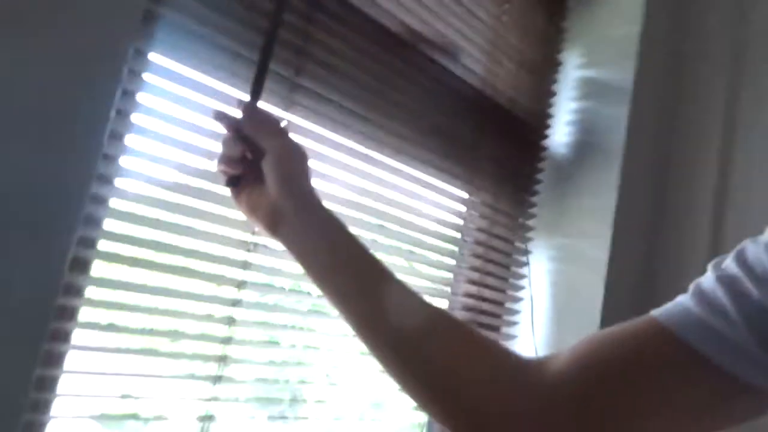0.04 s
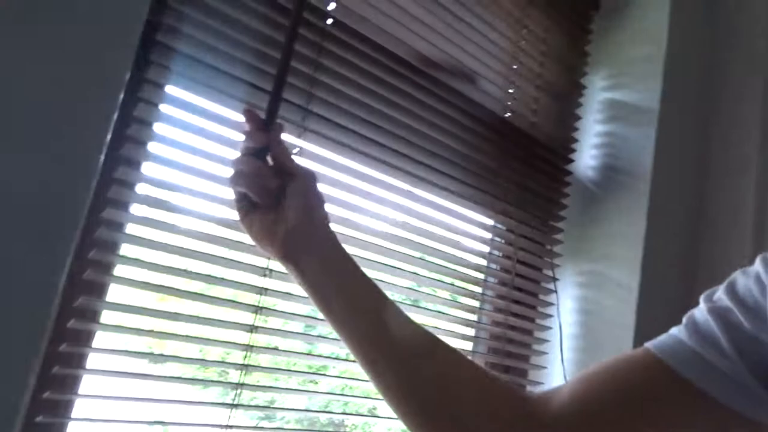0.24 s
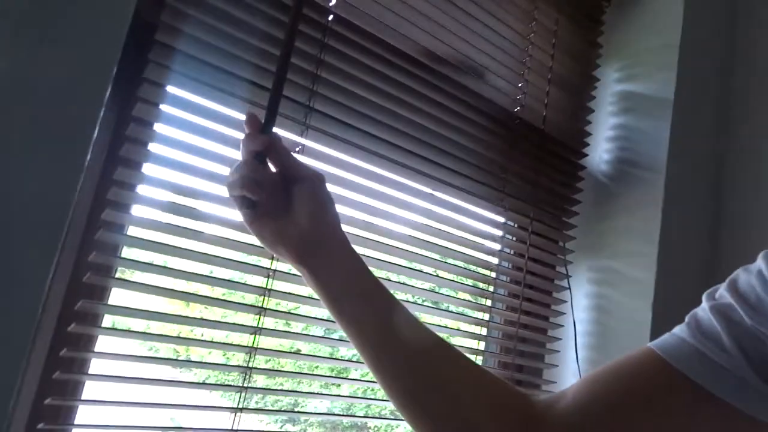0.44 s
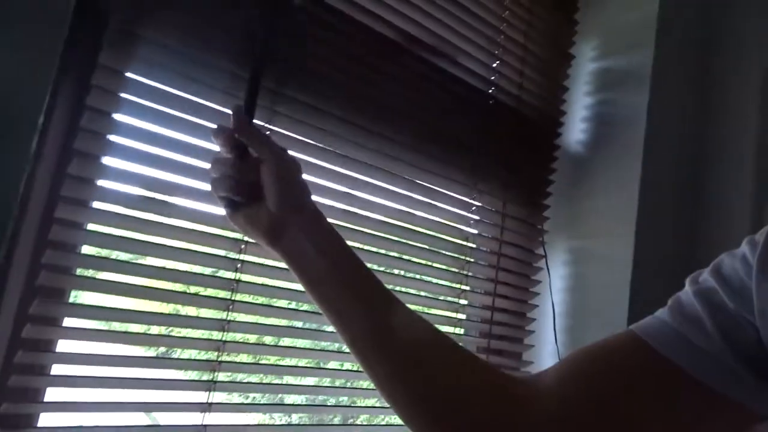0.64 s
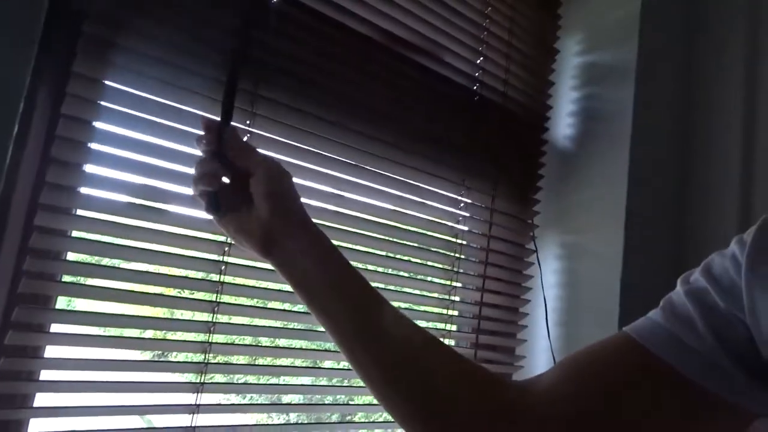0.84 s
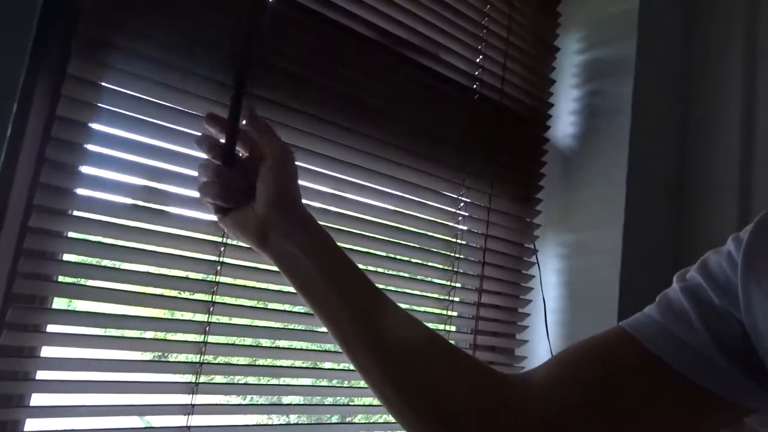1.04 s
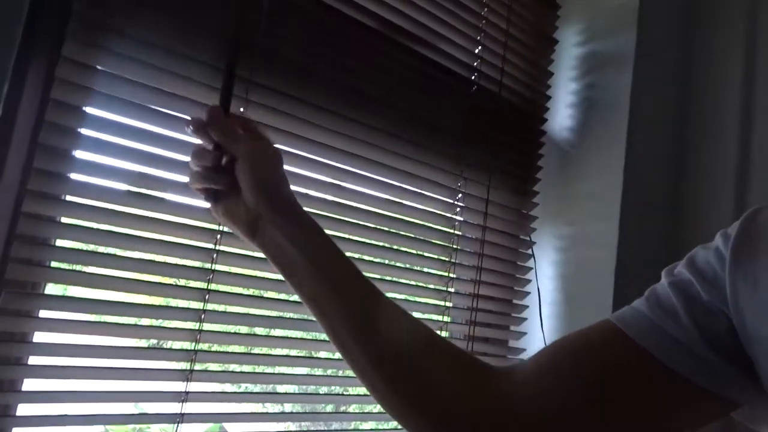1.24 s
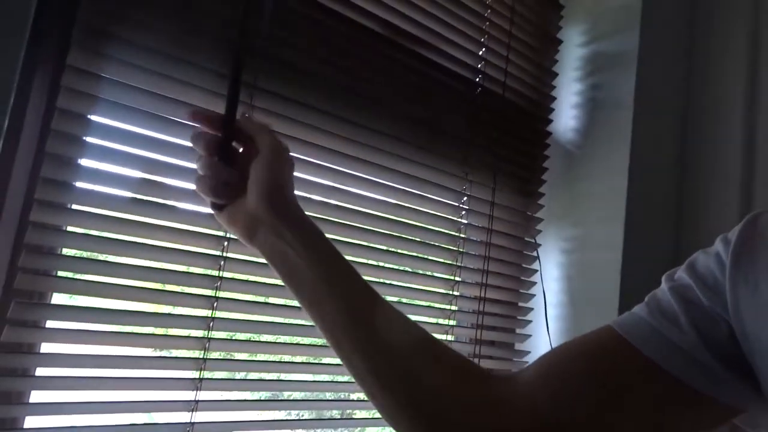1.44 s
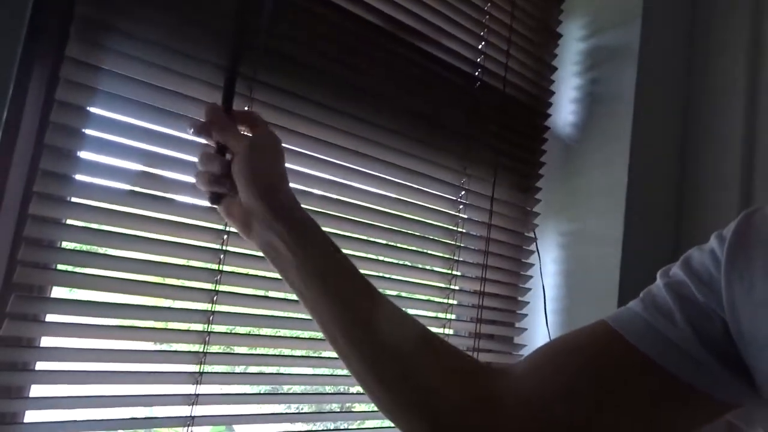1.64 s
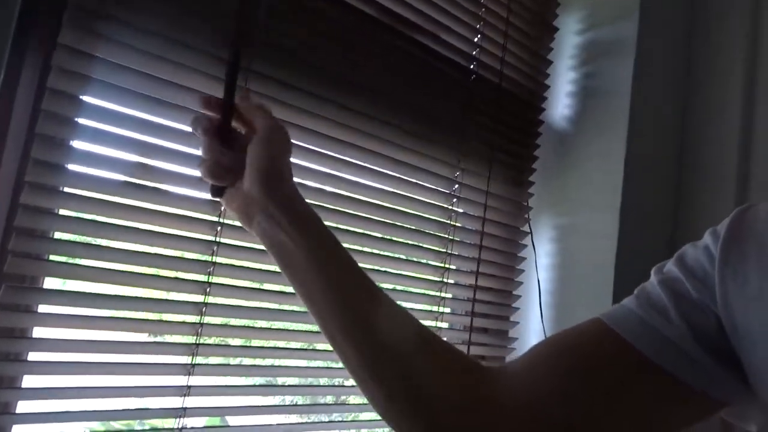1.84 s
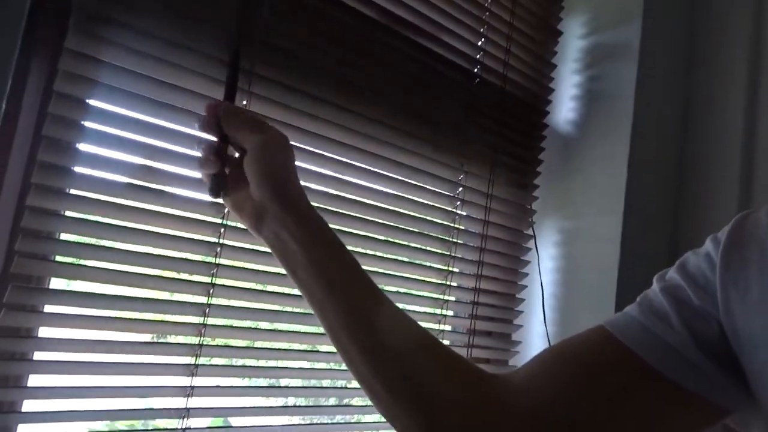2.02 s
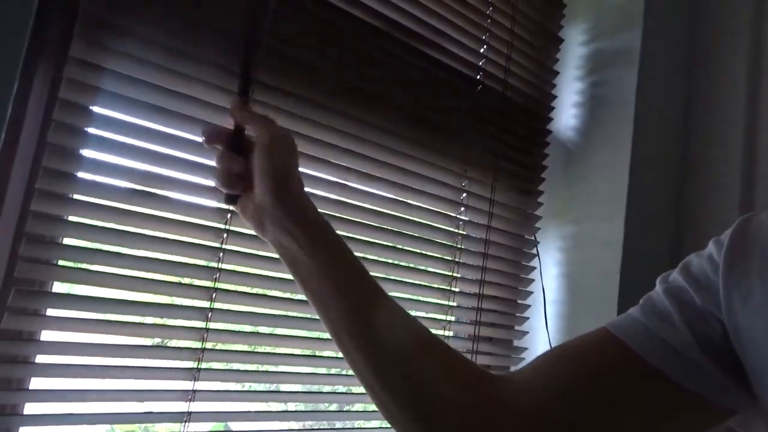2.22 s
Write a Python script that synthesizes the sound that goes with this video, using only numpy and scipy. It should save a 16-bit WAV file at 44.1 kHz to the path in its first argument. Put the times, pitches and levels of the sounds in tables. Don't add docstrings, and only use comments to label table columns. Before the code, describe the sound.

A wooden venetian blind clicks and rattles as its wand is twisted. Cloth rustles softly until 0.35 s with faint ticks. From 0.44 to 1.3 s, irregular woody knocks and slat clatter crowd together, with strong bursts near 0.54, 0.9 and 1.03 and a sharp tick at 1.19. Sparser knocks follow at 1.6, 1.67 and 2.08, with a faint finger rub around 1.83. Quiet room hiss, close stereo pickup, short reverberation.

```python
import sys
import numpy as np
from scipy import signal
from scipy.fft import rfft, irfft
from scipy.io import wavfile
from scipy.ndimage import uniform_filter1d

SR = 44100
rng = np.random.default_rng(int(sys.argv[2]) if len(sys.argv) > 2 else 0)


def magnitude_from_level(level_db):
    exponent = np.asarray(level_db, float) / 20
    return 10 ** exponent


def bounce(signal):
    frames = np.transpose(np.atleast_2d(signal))
    limited = np.clip(frames, -1, 1)
    pcm = np.round(limited * 32767).astype(np.int16)
    wavfile.write(sys.argv[1], SR, pcm)


N = 100371

WIDTH_RAD_PER_KHZ = 0.11
BASS_RISE_CYCLES = 2.17


def evened(x):
    return x / np.sqrt(np.mean(x ** 2) + 1e-20)


def read(points, hz):
    f, value = np.transpose(points)
    return np.interp(np.log(hz + 1), np.log(f + 1), value)


def add(mix, s, sound):
    part = mix[:, max(round(s * SR), 0):][:, :sound.shape[1]]
    part += sound[:, :part.shape[1]]


# frequency in Hz, left-right likeness from 0 to 1.
COHERENCE = [(60, 0.72), (220, 1), (820, 0.37), (3030, 0.23), (11200, 0.046)]


def hiss(colour, patchy_db, tilt_db=0):
    frames, hz = N // 128 + 5, np.fft.rfftfreq(512, 1 / SR)
    a, b, c, d, patches = rng.standard_normal((frames, 257, 5)).T
    patches = uniform_filter1d(patches, size=6, axis=0)
    patches = evened(uniform_filter1d(patches, size=10, axis=1))
    same = np.clip(read(COHERENCE, hz), -1, 1)[:, None]
    left, other = a + 1j * b, c + 1j * d
    z = np.array([left, same * left + np.sqrt(1 - same ** 2) * other])
    octaves = np.log2(np.maximum(hz[:, None], 500) / 2000)
    tilt = octaves * np.resize((tilt_db * np.ones(N))[::128], frames)
    z *= magnitude_from_level(read(colour, hz)[:, None] + patchy_db * patches + tilt)
    return evened(signal.istft(z, nperseg=512, noverlap=384)[1][:, :N])


# frequency in Hz, level in dB.
AIR_COLOUR = [(18, -50), (30, -51), (452, 4), (1350, 8.5), (5320, 5.5), (5870, 1), (6650, 3), (9660, -2),
              (11500, -5.5), (15000, -68), (22000, -120)]


def air():
    return magnitude_from_level(-60) * hiss(AIR_COLOUR, patchy_db=-0.5)


# time in seconds, level in dB, brightness in dB per octave.
SLEEVE_STROKE = [
    (0, -42, 1.5),
    (.08, -44.5, -3),
    (.12, -46, 3),
    (.18, -45.5, 3.5),
    (.23, -50, 2.5),
    (.3, -57.5, 5.5),
    (0.359, -66.5, -7),
]
# frequency in Hz, level in dB.
CLOTH_COLOUR = [(88, -86), (150, -47), (525, -6), (857, -3.5), (1740, 2.5), (1910, -4.5), (2890, -2),
                (10300, -22.5), (11500, -25), (15000, -69), (22000, -120)]


def sleeve():
    t = np.arange(N) / SR
    s, db, bright_db = np.transpose(SLEEVE_STROKE)
    cloth = hiss(CLOTH_COLOUR, patchy_db=0, tilt_db=np.interp(t, s, bright_db))
    cloth /= np.sqrt(abs(uniform_filter1d((cloth ** 2).mean(0), size=4000)) + 1e-9)
    cloth *= magnitude_from_level(0.81 * evened(uniform_filter1d(rng.exponential(1, N) - 1, size=250)))
    scrape = signal.filtfilt(*signal.iirpeak(556, 5, SR), rng.standard_normal(N))
    scrape = magnitude_from_level(-13.5) * evened(scrape) * np.exp(-(t / 0.19) ** 4)
    return magnitude_from_level(np.interp(t, s, db, right=-120)) * (cloth + scrape)


# frequency in Hz, level in dB.
SLAT_COLOUR = [(120, -71), (270, -43), (320, -35.5), (560, -26.5), (730, -10.5), (2600, -3.5), (4500, -5),
               (5800, -14), (11500, -30)]
# frequency in Hz, 60 dB decay time in seconds.
SLAT_DECAY = [(400, 0.29), (1000, 0.086), (3000, 0.053), (6000, 0.0097), (11000, 0.024)]


def slats(bright_db, count=4):
    hz, t = np.fft.rfftfreq(128, 1 / SR)[:, None], np.arange(130) * 32 / SR
    t60 = read(SLAT_DECAY, hz)
    noise = rng.standard_normal((2, count, 4128))
    z = signal.stft(noise, nperseg=128, noverlap=96)[2][..., :130]
    apart = np.clip(WIDTH_RAD_PER_KHZ * hz / 1000, 0, .6)
    z = np.array([z[0] - apart * z[1], z[0] + apart * z[1]]) / np.sqrt(1 + apart ** 2)
    swell = -np.expm1(-(hz * t + 0.069) / BASS_RISE_CYCLES)
    z = z * magnitude_from_level(-60 * t / t60) / np.sqrt(t60) * swell
    rings = signal.istft(z, nperseg=128, noverlap=96)[1][..., :4096]
    fine = np.fft.rfftfreq(8192, 1 / SR)
    colour_db = read(SLAT_COLOUR, fine) + bright_db * np.log2(np.maximum(fine, 500) / 2000)
    log_gain = np.log(magnitude_from_level(colour_db) + 1e-5)
    causal = np.exp(np.conj(signal.hilbert(np.r_[log_gain, log_gain[-2:0:-1]])))[:4097]
    rings = irfft(rfft(rings, 8192) * causal)[..., :4500]
    return rings / np.linalg.norm(rings) * np.sqrt(2 * count)


def levelled(x):
    z = rfft(x)
    hz = np.fft.rfftfreq(2 * len(z[0]) - 2, 1 / SR)
    power = (abs(z) ** 2).sum(0) / magnitude_from_level(2 * read(SLAT_COLOUR, hz))
    lumps = uniform_filter1d(power, size=26) / uniform_filter1d(power, size=300)
    return irfft(z / np.sqrt(abs(lumps) + .1), x.shape[1]) * (np.arange(x.shape[1]) < 7500)


RAIL_MODE_HZ = np.array([716, 787, 925, 1100, 1203, 1358, 1825, 1933, 2106, 2532, 2835, 3413, 3556, 3754])
RAIL_MODE_DB = [-2, -1, -6, -5, -6, -6, 0, -4, -1, 0, -6, -6, -4, -3]


def head_rail(knocks, bright_db):
    hz, t = RAIL_MODE_HZ, np.arange(4500) / SR
    db = RAIL_MODE_DB + bright_db * np.log2(hz / 2000) + 2.5 * rng.standard_normal(len(hz))
    db -= 20 * np.log10(abs(rfft(knocks, SR)[hz]) + .3)
    chance = rng.standard_normal((len(hz), 2))
    t60 = .07
    modes = np.exp(np.outer(2j * np.pi * hz - np.log(1000) / t60, t))
    modes *= -np.expm1(-np.outer(hz, t) / BASS_RISE_CYCLES)
    apart = WIDTH_RAD_PER_KHZ * hz / 1000 * chance[:, 1] * np.array([[-.5], [.5]])
    ring_out = ((magnitude_from_level(db) * np.exp(1j * (7 * chance[:, 0] + apart))) @ modes).real
    ring_out *= np.sqrt(2) / np.linalg.norm(ring_out)
    return signal.fftconvolve(knocks[None], ring_out, axes=1)


# start in seconds, spread of the knocks in seconds, level in dB,
# brightness in dB per octave, rise in seconds.
GEAR_SLIPS = [(.441, 0.009, -37, 1, 0.00022), (.533, 0.0024, -31.5, 1, 0.00098),
              (.539, 0.0099, -33.5, -2, 0.0081), (0.6803, 0.0046, -28.5, -0.5, 0.00078),
              (.816, 0.013, -37, -0.5, 0.0011), (0.835, 0.014, -39, -4.5, 0.0051),
              (0.895, 0.0036, -25.5, 9.5, .003), (0.9, 0.0098, -26, -2, 0.0048),
              (1.0265, 0.0089, -25, -2.5, 0.00043), (1.057, 0.0025, -34, 1, 0.00069),
              (1.165, 0.025, -35.5, -4, 0.00043), (1.194, 0.0085, -32, -2, 0.000097),
              (1.2395, 0.0076, -32, 4.5, 0.00026), (1.26, 0.0042, -29.5, -1, 0.0035),
              (1.269, 0.009, -25, 0.5, 0.0038), (1.592, 0.0072, -24.5, 0, 0.0044),
              (1.673, 0.0058, -33, -0.5, 0.0014), (2.007, 0.0052, -39, 0, 0.00016),
              (2.0765, 0.0071, -28.5, -2, 0.00086), (.604, 0.017, -38, -2.5, 0.0081),
              (0.869, 0.029, -32.5, -4, 0.039), (1.548, 0.037, -48.5, -3.5, 0.021),
              (2.049, 0.023, -41, -5.5, 0.015)]
# start in seconds, spread in seconds, level in
# dB, brightness in dB per octave.
SMALL_JOLTS = [(.001, 0.0032, -38, 27), (0.193, 0.0061, -47.5, -6.5), (0.355, 0.0034, -53, -1),
               (.43, 0.0044, -52.5, -5.5), (.495, 0.093, -46, -8.5), (0.0561, 0.0011, -45, 0.5),
               (0.107, 0.0077, -48.5, -4), (.675, 0.0014, -45.5, 4), (.693, 0.012, -56, 9),
               (0.7432, 0.0054, -44, -3.5), (.765, 0.0073, -42.5, -5.5), (1.085, 0.0068, -39, -2.5),
               (1.385, 0.0023, -48.5, 1.5), (1.943, 0.0039, -49, -8.5), (2.213, 0.0051, -52, -2),
               (2.243, 0.0034, -50.5, -6.5)]


def jolt(start, spread, level_db, bright_db, rise=0.0012):
    t = np.arange(4000) / SR
    draw, size, which = rng.random(4000), rng.exponential(1, 4000), rng.integers(0, 4, 4000)
    knocks_per_s = 5000
    knocks = (draw < knocks_per_s / SR) * np.sign(np.sin(1e7 * draw))
    knocks[0] = 1
    knocks *= magnitude_from_level(2.5 * np.minimum(size, 4))
    knocks *= -np.expm1(-(t + 1e-4) / max(rise, 1e-4)) * np.exp(-t / max(spread, .001))
    knocks /= np.linalg.norm(knocks)
    shared = knocks * (which == np.arange(4)[:, None])
    body = signal.fftconvolve(shared[None], slats(bright_db), axes=2).sum(1)
    knocking = levelled(body + magnitude_from_level(-7) * head_rail(knocks, bright_db))
    push = np.arange(body.shape[1]) / SR / 0.00116
    thump = magnitude_from_level(-67) * rng.uniform(-1.0, 1, (2, 1)) * push * (2 - push) * np.exp(-push)
    return start, magnitude_from_level(level_db - 1 + 30) * (knocking + thump)


# time in seconds, peak in dB, pitch in Hz, decay in cycles.
HOOK_TICKS = [(0.0581, -20, 8900, 5.7), (0.2433, -29.5, 3700, 18.6), (0.535, -13.5, 9550, 0.8),
              (0.6484, -20, 4120, 2.2), (.686, -39, 3940, 1.7), (0.745, -19, 3900, 2.6),
              (1.0319, -12.5, 2990, 4), (0.8171, -23.5, 4580, 19), (1.1942, -5.5, 3720, 3.1),
              (1.24, -12.5, 7600, 1.2), (1.386, -25, 4150, 1.8), (2.009, -23.5, 4840, 3.3),
              (2.021, -32, 3020, 1.6), (2.251, -34, 3680, 5.4)]


def tick(s, peak_db, hz, cycles):
    turns = np.arange(4500) / SR * hz
    snap = np.sin(2 * np.pi * turns) * np.exp(-turns / cycles * 2) * np.minimum(4 * turns / cycles, 1)
    snap = signal.sosfilt(signal.butter(4, hz * .4, "high", fs=SR, output="sos"), snap)
    body = magnitude_from_level(-5.5) * np.linalg.norm(snap) * slats(5, count=1)[:, 0]
    return s - .0003, magnitude_from_level(peak_db) * (snap + body)


# time in seconds, peak in dB, pitch in Hz, 60 dB decay time in seconds.
SLAT_RINGS = [(0.5403, -30, 2170, 0.023), (0.544, -26.5, 1530, 0.034), (0.5527, -30, 1906, 0.086),
              (0.554, -27.5, 1195, 0.039), (0.6189, -36, 1760, 0.021), (0.6815, -28, 2290, 0.029),
              (0.6825, -30.5, 3560, 0.013), (0.683, -30.5, 2930, 0.012), (0.6815, -32.5, 1600, 0.011),
              (0.687, -34, 4120, 0.011), (0.8201, -31, 3520, 0.017), (0.8454, -35.0, 1200, 0.035),
              (0.8983, -27.5, 3180, 0.037), (0.901, -30.5, 1232, 0.038), (0.902, -25.5, 3766, 0.015),
              (0.9025, -39, 4340, 0.028), (0.9072, -22.0, 2550, 0.018), (0.9074, -18.5, 1853, 0.02),
              (0.9114, -31, 712, 0.059), (0.9128, -23.5, 2510, 0.099), (0.9153, -20, 1857, 0.031),
              (0.9249, -30.5, 746, 0.021), (1.0302, -23.5, 2089, 0.042), (1.0331, -27, 2514, 0.058),
              (1.0332, -18, 3720, 0.011), (1.0606, -37, 2526, 0.096), (1.2127, -38.5, 748, 0.056),
              (1.241, -36, 3270.0, 0.016), (1.2705, -30.5, 2576, 0.058), (1.2726, -29.5, 2164, 0.082),
              (1.2751, -29.0, 2930, 0.01), (1.2781, -37, 3560, 0.014), (1.2791, -33, 767, 0.041),
              (1.2881, -35, 2420, 0.029), (1.2918, -27.5, 1080, 0.015), (1.5965, -25.5, 3164, 0.031),
              (1.5988, -22, 1755, 0.019), (1.5995, -28.0, 2830, 0.024), (1.6034, -28, 2180, 0.024),
              (1.605, -28, 2747, 0.03), (1.6761, -29, 2546, 0.047), (1.6782, -26, 3560, 0.011),
              (2.0793, -37, 2115, 0.096), (2.079, -31.5, 2573, 0.024), (2.0818, -23.5, 3800, 0.011),
              (2.0832, -32.0, 1827, 0.1)]
# time in seconds, peak in dB, pitch in Hz, 60 dB decay
# time in seconds.
MORE_SLAT_RINGS = [
    (1.284, -35, 700, 0.073),
    (.355, -57, 1195, 0.15),
    (.444, -43.5, 750, 0.24),
    (1.597, -53.5, 320, 0.12),
    (0.8, -34, 1170, 0.035),
    (0.899, -30, 6400, 0.014),
    (0.53, -60.5, 317, 0.26),
    (1.706, -32, 3900, 0.014),
    (2.011, -37.5, 2350, 0.032),
    (2.092, -39, 700, .04),
]


def ring(s, peak_db, hz, t60):
    t, rise_s = np.arange(8000) / SR, 0.001986
    shape = np.expm1(-t / rise_s) ** 2 * magnitude_from_level(-60 * t / max(t60, .01))
    apart = WIDTH_RAD_PER_KHZ * hz / 1000 * np.array([[-.5], [.5]])
    return s - rise_s, magnitude_from_level(peak_db + 0.5) * shape / shape.max() * np.sin(2 * np.pi * hz * t + apart)


# time in seconds, level in dB.
RUB_STROKE = [
    (1.795, -102),
    (1.812, -58.5),
    (1.835, -55),
    (1.86, -62),
    (1.885, -71),
    (1.92, -64),
]
# frequency in Hz, width in Hz, level in dB.
WAND_RESONANCES = [(4700, 900, 0), (5600, 800, -3), (6500, 700, 0)]


def fingers():
    hz = np.geomspace(1000, 11000, 80)
    peaks = sum(magnitude_from_level(db) / (1 + (2 * (hz - f) / w) ** 2) for f, w, db in WAND_RESONANCES)
    level = np.interp(np.arange(N) / SR, *np.transpose(RUB_STROKE), left=-120, right=-120)
    return magnitude_from_level(level) * hiss(np.transpose([hz, 20 * np.log10(peaks)]), patchy_db=2)


# frequency in Hz, 60 dB decay time in seconds.
ROOM_DECAY = [(400, 0.21), (1000, 0.38), (3000, 0.21), (10000, 0.21)]


def room(x):
    taps = np.zeros((2, SR // 2))
    slots = np.arange(60, SR // 2 - 20, 20)
    at = slots + rng.integers(0, 20, (2, len(slots)))
    np.put_along_axis(taps, at, rng.choice([-1., 1.], at.shape), 1)
    taps[1] = 0.66 * taps[0] + 0.67 * taps[1]
    hz, t, z = signal.stft(taps, SR, nperseg=256)
    tail = signal.istft(z * magnitude_from_level(-60 * t / read(ROOM_DECAY, hz)[:, None]), SR, nperseg=256)[1]
    z = rfft(tail)
    smooth = np.sqrt(uniform_filter1d(abs(z) ** 2, size=40, axis=1))
    tail = irfft(z / smooth, tail.shape[1])
    return signal.fftconvolve(x, tail / np.linalg.norm(tail, axis=1, keepdims=True), axes=1)[:, :N]


def scene():
    blind, hook = np.zeros((2, N)), np.zeros((2, N))
    for row in GEAR_SLIPS + SMALL_JOLTS:
        add(blind, *jolt(*row))
    for row in SLAT_RINGS + MORE_SLAT_RINGS:
        add(hook, *ring(*row))
    for row in HOOK_TICKS:
        add(hook, *tick(*row))
    sent = magnitude_from_level(-5) * blind + magnitude_from_level(-12.5) * hook
    turn = 2 * np.pi * 9 * np.arange(N) / SR
    near = blind + hook + room(sent * np.cos(turn)) + room(sent * np.sin(turn))
    left_db = -3
    return (near + sleeve() + fingers() + air()) * magnitude_from_level([[left_db / 2], [-left_db / 2]])


def roll_off(x):
    return signal.sosfilt(signal.butter(12, 11810, fs=SR, output="sos"), x)


def record(dry):
    ports = np.array([dry[0], np.roll(dry[1], 1)])
    lowpass = signal.firwin(127, 11025, window=("kaiser", 4), fs=SR)
    return roll_off(signal.oaconvolve(ports, lowpass[None], "same"))


dry = scene()
out = record(dry)
bounce(out)
```